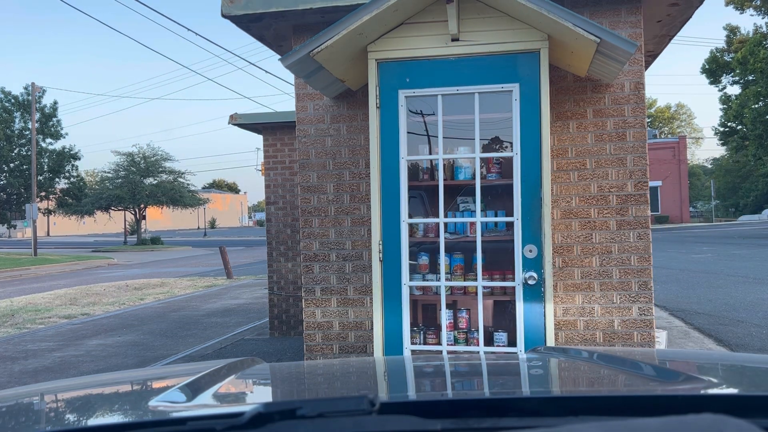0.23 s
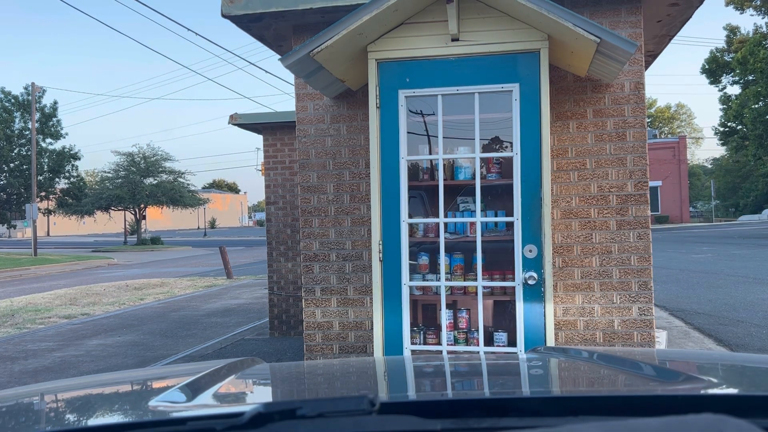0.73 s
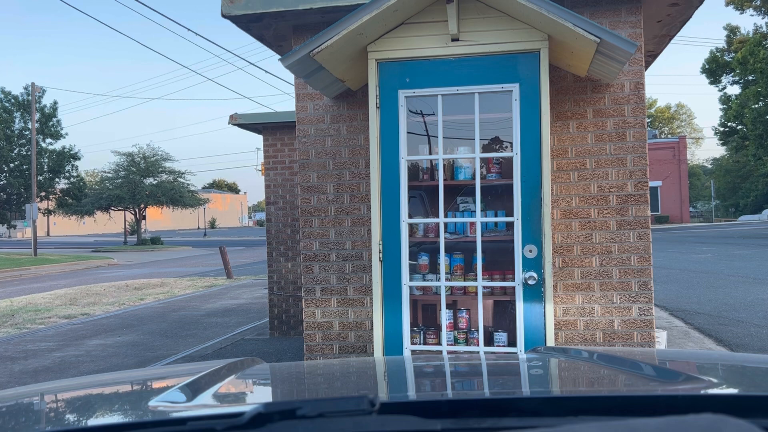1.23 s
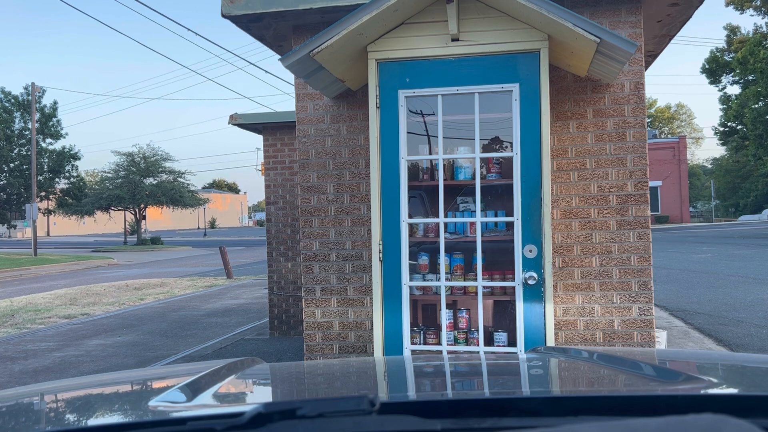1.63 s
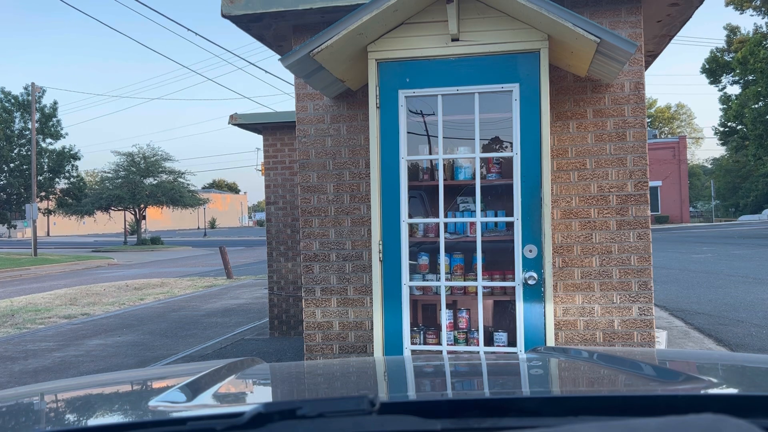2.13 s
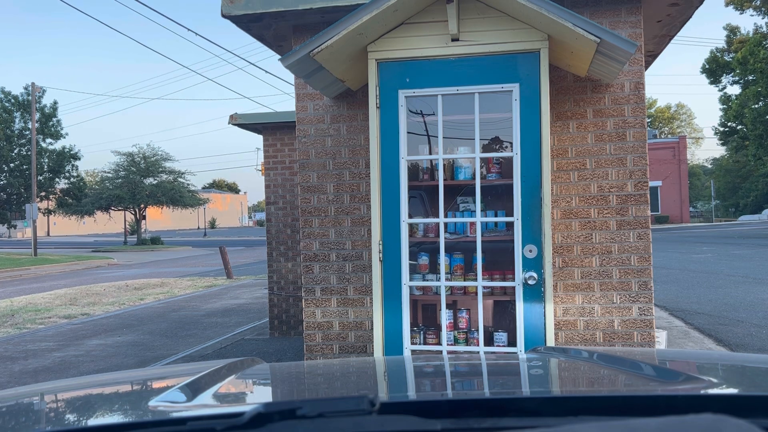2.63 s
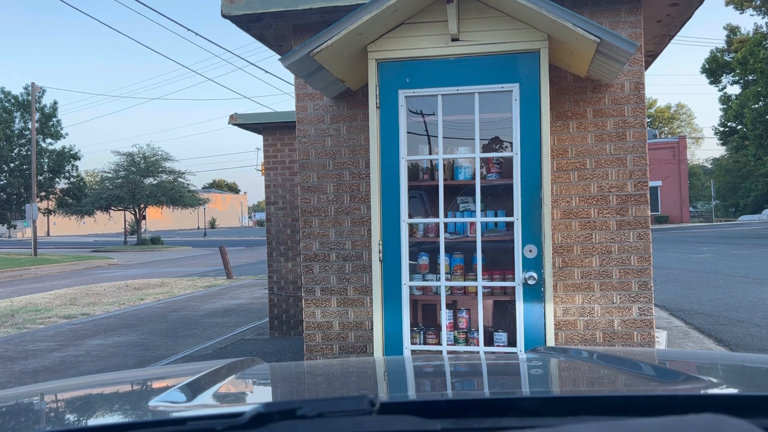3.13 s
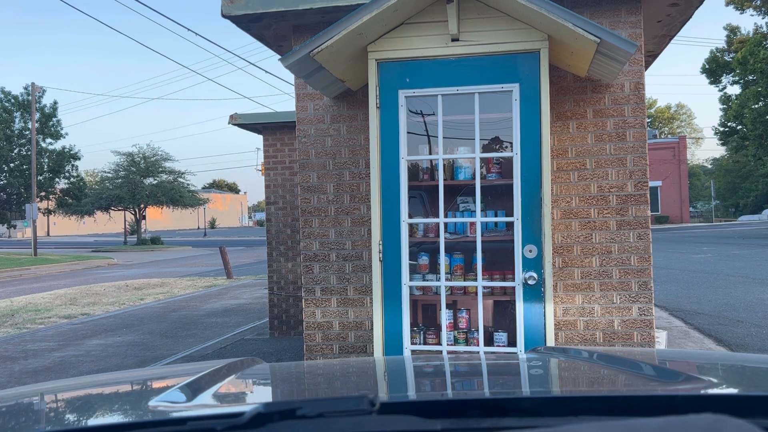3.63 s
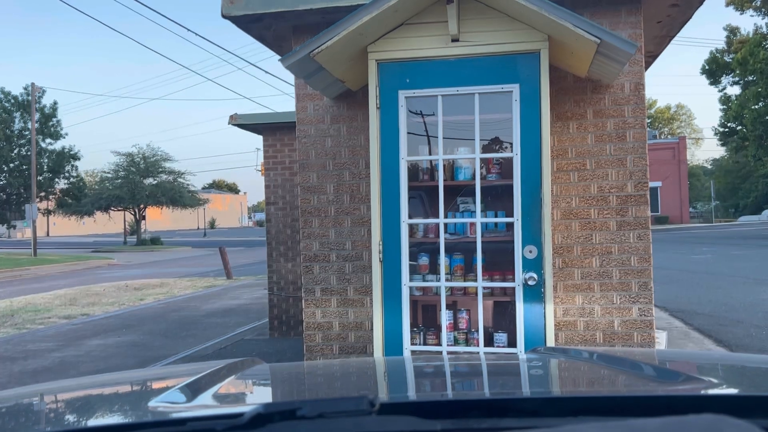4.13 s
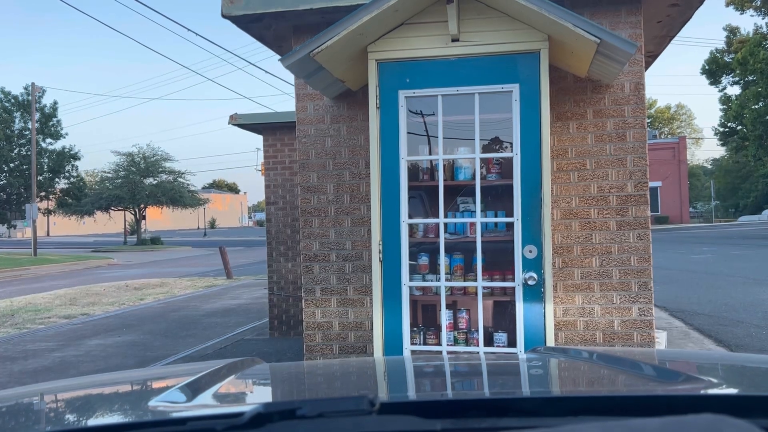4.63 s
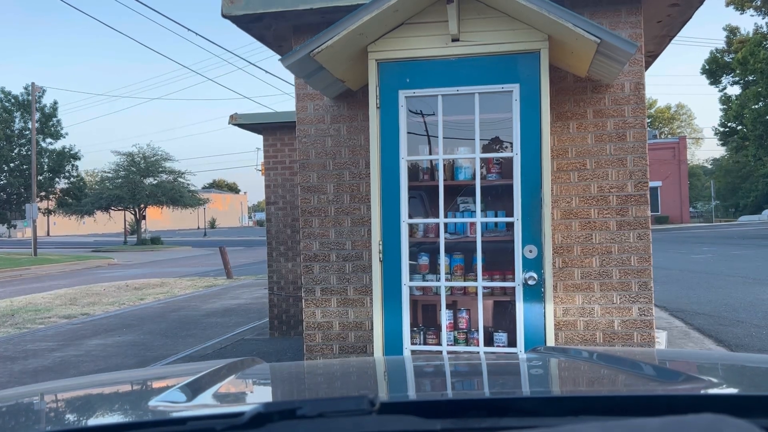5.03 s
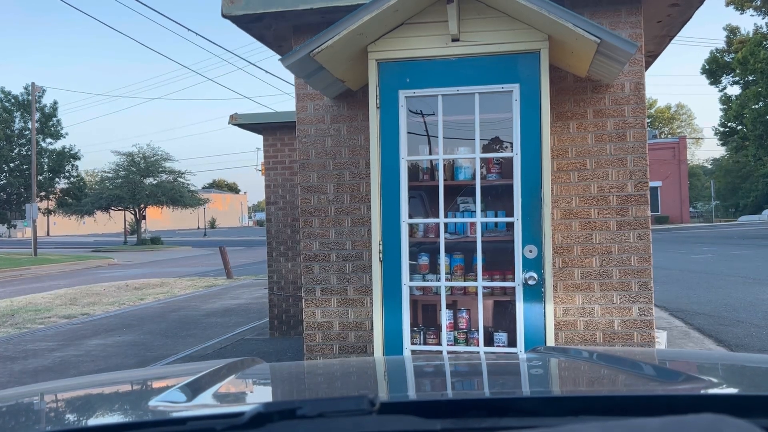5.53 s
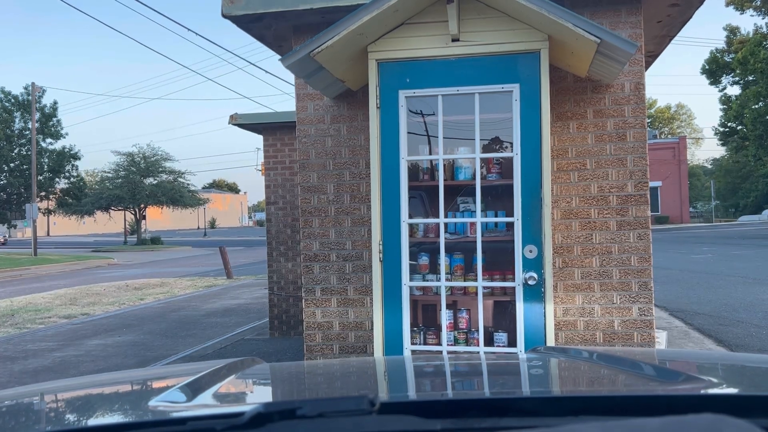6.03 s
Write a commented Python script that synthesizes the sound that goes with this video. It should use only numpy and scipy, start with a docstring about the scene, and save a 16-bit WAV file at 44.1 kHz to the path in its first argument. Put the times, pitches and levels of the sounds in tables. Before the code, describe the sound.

A close stereo microphone inside a small, padded car cabin picks up a steady bassy idle. Someone shifts on the seat, cloth scuffing and plastic ticking lightly, until a hard metallic latch clack. A couple of soft low bumps pass, then the door shuts heavily with a short rattle and sinking boom. Fabric swishes, ticks and dull knocks continue briefly, the last knock strong and low, then the engine idles on.

```python
"""Inside an idling car with one door open: clothes rustle on a seat, a latch clacks, the door is slammed.
Wavering low tones and coloured noise make the engine rumble; filtered hiss from outside drops at the slam.
Shaped noise and tiny random contacts make the cloth; decaying resonances make trim, latch and door.
The slam sets off sinking low tones and a dying chatter; more rustling and a few dull knocks follow."""
import sys
import numpy as np
from scipy import signal
from scipy.fft import rfft, irfft, next_fast_len
from scipy.io import wavfile
from scipy.ndimage import map_coordinates

SR = 44100
rng = np.random.default_rng(int(sys.argv[2]) if len(sys.argv) > 2 else 0)


def materialize(psi):
    """Save the field psi as 16-bit PCM at rate SR to the path in sys.argv[1].

    A 1-D psi becomes a single channel; in a 2-D psi each row is a channel.
    """
    bounded = np.clip(np.atleast_2d(psi).T, -1, 1)
    quanta = np.round(bounded * 32767).astype(np.int16)
    wavfile.write(sys.argv[1], SR, quanta)


N = 276948


def amp(db):
    """Decibels to gain."""
    return 10 ** (np.asarray(db) / 20)


def unit(x):
    """Scale to rms 1."""
    return x / np.sqrt(np.mean(x ** 2) + 1e-20)


def clock():
    """The time of every sample in seconds."""
    return np.arange(N) / SR


def along(points, hz):
    """Read a curve of (Hz, value) points on a log frequency axis."""
    point_hz, values = np.transpose(points)
    return np.interp(np.log(hz + 1), np.log(point_hz + 1), values)


def wobble(knots_per_s):
    """A smooth random curve through normally distributed knots."""
    return map_coordinates(rng.standard_normal(2048), [clock() * knots_per_s], mode="wrap")


def filtered(x, response):
    """Multiply the spectrum of x by a response given as a function of frequency."""
    n = x.shape[-1]
    padded = next_fast_len(n + 8192)
    return irfft(rfft(x, padded) * response(np.fft.rfftfreq(padded, 1 / SR)), padded)[..., :n]


def tilted(x, bright_db):
    """Brighten or dull a blow by about bright_db per octave, less so in the bass."""
    return filtered(x, lambda hz: amp(bright_db * np.log2((hz + 300) / 1600)))


def add(track, start_s, sound):
    """Mix a sound into the track, cut at the track's end."""
    part = track[..., round(start_s * SR):][..., :sound.shape[-1]]
    part += sound[..., :part.shape[-1]]


def swells(rows):
    """Sum of bell-shaped swells, one for each (center_s, level_db, length_s)."""
    t = clock()
    return sum(amp(db) * np.exp(-2 * ((t - s) / length) ** 2) for s, db, length in rows)


# left-right likeness: pitch_hz, correlation (1 = same, 0 = unrelated, -1 = opposite)
LIKENESS = [(60, 0.99), (130, 0.99), (290, 0.7), (640, -0.37), (1400, -0.067), (2400, 0.76), (4400, -0.16),
            (7000, 0.54), (15000, -0.41)]


def port_phase(hz):
    """Phase of a tone at left and right: the less alike the two sides, the further apart."""
    skew = np.arccos(np.clip(along(LIKENESS, hz), -1, 1)) / 2
    return np.array([-skew, skew])


def spread(pair):
    """Blend two unrelated signals into a cabin sound field: alike in the bass, less so higher up."""
    def mid_side(hz):
        turn = port_phase(hz)[1]
        return np.array([np.cos(turn), np.sin(turn)])
    mid, side = filtered(pair, mid_side)
    return np.array([mid + side, mid - side])


# standing waves of the cabin: pitch_hz, width_hz, gain_db
STANDING_WAVES = [(258, 31.6, -7.5), (559, 15.3, 9), (880, 50, 5), (1720, 57, -12), (1766, 89, 5.5)]


def hollow(hz):
    """Standing waves between glass and dashboard lift some bands and cut others."""
    return amp(sum(db / (1 + (2 * (hz - centre) / width) ** 2) for centre, width, db in STANDING_WAVES))


def rush(spectrum):
    """Stereo noise of rms 1 with the given colour, heard through the cabin."""
    noise = rng.standard_normal((2, N))
    return unit(spread(filtered(noise, lambda hz: amp(along(spectrum, hz)) * hollow(hz))))


def grains(per_s, spectrum):
    """Stereo stream of tiny random contacts with the given colour, heard through the cabin."""
    taps = (rng.random((2, N)) < per_s / SR) * rng.uniform(-0.89, 1, (2, N))
    return spread(filtered(taps, lambda hz: amp(along(spectrum, hz)) * hollow(hz)))


# decay of the cabin echo: pitch_hz, t60_s
ECHO_DECAY = [(150, 0.47), (1000, 0.14), (4000, 0.15), (12000, 0.0078)]


def in_cabin(x, wet_db):
    """Add the short, dense echo of glass and trim by convolving with decaying noise."""
    hz, t, bands = signal.stft(rng.standard_normal((2, SR // 3)), SR, nperseg=256)
    fade = amp(-60 * t / along(ECHO_DECAY, hz)[:, None])
    tail = spread(signal.istft(bands * fade, SR, nperseg=256)[1])
    echo = signal.fftconvolve(x, tail / np.linalg.norm(tail[0]), axes=1)[:, :N]
    return x + amp(wet_db) * echo


def strike(modes, crack_db, crack_t60, crack_hz, detune, rise=0.00074):
    """One stereo blow of peak 1: decaying modes and a short crack that dulls above crack_hz."""
    t = np.arange(SR // 3) / SR
    hz, db, t60 = np.transpose(modes)[:, :, None]
    # each contact point rings a little differently
    hz = hz * np.exp(detune * rng.standard_normal(hz.shape))
    mode_db = db + rng.standard_normal(hz.shape)
    sign = (-1) ** np.arange(len(hz))[:, None]
    size = sign * amp(mode_db - 60 * t / t60)
    ring = np.sum(size * np.sin(2 * np.pi * hz * t + port_phase(hz)), axis=1)
    noise = rng.standard_normal((2, len(t)))
    crack = unit(filtered(noise, lambda f: 1 / np.hypot(1, f / crack_hz)))
    blow = (ring + crack * amp(crack_db - 60 * t / crack_t60)) * (1 - np.exp(-t / rise))
    return blow / np.abs(blow).max()


BASS_SKEW = 0.15  # radians by which low thuds lag at left and lead at right


def soft_contacts(rows):
    """A cushioned contact swells and dies around its centre, on one damped resonance."""
    track, t = np.zeros((2, N)), np.arange(-SR // 8, SR // 8) / SR
    for center_s, db, hz, length_s in rows:
        tone = np.sin(2 * np.pi * hz * t + [[-BASS_SKEW], [BASS_SKEW]])
        add(track, center_s + t[0], amp(db) * np.exp(-(t / length_s) ** 2) * tone)
    return track


def shut():
    """How far the door has sealed: 0 while open, 1 once shut."""
    return np.interp(clock(), [3.95, 4.05], [0, 1])


FIRING_HZ = 32.4  # mean rate; it wavers slightly
# engine hum: multiple of the firing rate, open_db, shut_db (mean levels)
FIRING_ORDERS = [(1, -40, -39), (1.5, -36.5, -39.5), (2, -41.5, -47), (3, -45, -50), (4, -52, -55)]
# fan and belt-driven parts: pitch_hz, open_db, shut_db (mean levels)
FAN_AND_BELTS = [(39.1, -48.5, -46), (44.3, -42.5, -37), (79.4, -52, -47)]
# colour of the body noise before its low cut: pitch_hz, relative db per Hz
BODY_NOISE = [(15, -66), (27, -6), (53, 4.5), (72, -7.5), (128, -17), (200, -18), (245, -21), (310, -24),
              (450, -31.5), (560, -35.5), (900, -37.5), (1800, -47.5), (2700, -71.5), (4000, -73),
              (5700, -54), (8500, -70), (15000, -71)]


def engine():
    """Firing orders beat against fan and belts; shutting the door retunes the cabin, shifting levels."""
    turns = FIRING_HZ * np.cumsum(1 + 0.004 * wobble(3)) / SR
    tones = [(k * FIRING_HZ, k * turns, *levels) for k, *levels in FIRING_ORDERS]
    tones += [(hz, hz * (clock() + 0.00013 * wobble(3.7)), *levels) for hz, *levels in FAN_AND_BELTS]
    hum, sealed = 0, shut()
    for hz, cycles, open_db, shut_db in tones:
        level = amp(open_db + (shut_db - open_db) * sealed + wobble(2.75))
        hum = hum + np.sqrt(2) * level * np.sin(2 * np.pi * cycles + port_phase(hz)[:, None])
    body = filtered(rush(BODY_NOISE), lambda hz: 1 / np.hypot(1, (95 / (hz + 1)) ** 2))
    # the body noise swells with each firing
    throb = 1 + 0.25 * np.cos(2 * np.pi * turns)
    return hum + amp(-25.0 - 0.8 * sealed) * body * throb


# colour of the outside hiss: pitch_hz, relative db per Hz
OUTSIDE_HISS = [(120, -11.5), (280, -2.5), (450, -13.5), (560, -6), (720, -14), (920, -9.5), (1900, -18),
                (2750, -22.5), (3800, -17), (5800, -15), (8000, -36.5), (15000, -142.5)]
# sideways lean of the hiss: pitch_hz, lean_db (raises left and lowers right)
LEFT_LEAN = [(480, .5), (950, -1), (3800, 1.4)]


def outside():
    """Hiss from the street and engine bay, leaning left in the treble, weaker once the door seals."""
    hiss = filtered(rush(OUTSIDE_HISS), lambda hz: amp(along(LEFT_LEAN, hz) * [[1], [-1]]))
    return amp(-45 - 5.3 * shut()) * hiss


RELEASE_S = 0.069  # time constant of the cloth settling after each shift
# shifts of weight on the seat: full_s (fully moving), level_db, attack_s, hold_s
WEIGHT_SHIFTS = [(0.257, -47.5, 0.1, 0.019), (0.545, -41.5, 0.017, 0.012), (0.736, -44, 0.052, 0.0059),
                 (1.029, -40.5, 0.047, 0.055), (1.499, -42.5, 0.058, 0.029), (1.926, -38, 0.14, 0.087),
                 (2.38, -31.5, 0.047, 0.01), (3.483, -45, 0.27, 0.4), (3.784, -40.5, 0.027, 0.075),
                 (3.907, -36, 0.035, 0.068), (4.172, -30, 0.0015, 0.11), (4.352, -35.5, 0.019, 0.19),
                 (4.61, -36.5, 0.018, 0.11)]


def shifting():
    """Strength of the rubbing: each shift of weight builds up, holds and dies away."""
    t, power = clock(), 0
    for full_s, db, attack_s, hold_s in WEIGHT_SHIFTS:
        rise = np.exp(-(np.minimum(t - full_s, 0) / attack_s) ** 2)
        fall = np.exp(-np.maximum(t - full_s - hold_s, 0) / RELEASE_S)
        power = power + (amp(db) * rise * fall) ** 2
    return np.sqrt(power)


# colour of light rubbing: pitch_hz, relative db per Hz
LIGHT_RUB = [(150, 19.5), (400, 4), (900, 1), (1700, -6), (2800, -7), (4500, -6), (7500, -12.5),
             (15000, -16)]


def rubbing():
    """Light rubbing is flickering noise that follows each shift of weight."""
    return shifting() * unit(rush(LIGHT_RUB) * amp(0.82 * wobble(150)))


SNAG_DB, SNAG_PER_S = 3, 70  # a slide sticks and lets go: depth and rate
# colour of firm rubbing: pitch_hz, relative db per Hz
FIRM_RUB = [(150, -3), (700, 1), (1700, 0), (2700, -6), (4000, -5), (7000, -14), (15000, -21)]
# firm slides across the upholstery: center_s, level_db, length_s
FIRM_SLIDES = [(.75, -42.5, 0.034), (1.04, -34, 0.025), (1.36, -41.5, 0.046), (1.97, -48, 0.15),
               (2.39, -27, 0.03), (4.182, -32, 0.0068), (4.631, -32.5, 0.026)]


def sliding():
    """In a firm slide the cloth catches and slips in tiny grains, unevenly loud."""
    scrape = grains(1200, FIRM_RUB) * amp(SNAG_DB * wobble(SNAG_PER_S))
    return swells(FIRM_SLIDES) * unit(in_cabin(scrape, wet_db=-2.5))


SWISH_HZ, SWISH_OCTAVES = 12500, 6.9  # centre and width of the hiss
# brief swishes of smooth fabric: center_s, level_db, length_s
FABRIC_SWISHES = [(3.5, -51, 0.19), (4.26, -41.5, 0.06), (4.38, -42, 0.012), (4.543, -36, 0.009),
                  (4.69, -39.5, 0.031)]


def swishing():
    """Smooth fabric gives brief swells of broad, bright hiss."""
    def colour(hz):
        return np.exp(-(np.log2((hz + 1) / SWISH_HZ) / SWISH_OCTAVES) ** 2)
    hiss = spread(filtered(rng.standard_normal((2, N)), colour))
    return swells(FABRIC_SWISHES) * unit(hiss)


FUMBLE_PER_S, FUMBLE_DB = 23, -10.5  # mean contacts at each place, and their level against the cloth
# trim ring: pitch_hz, relative level_db, t60_s
TRIM_RING = [(407, -11.5, 0.032), (700, -16, 0.015), (860, -18, 0.028), (1072, 1.5, 0.05), (1400, 8, 0.037),
             (1438, 4, 0.033), (1818, 5, 0.054), (2220, -11, 0.021), (2802, 1, 0.038)]


def fumbling():
    """Seams and buttons scuff the trim at many random places, as hard as the body is moving."""
    rattle = 0
    for place in range(12):
        taps = (rng.random(N) < FUMBLE_PER_S / SR) * rng.standard_normal(N)
        blow = strike(TRIM_RING, crack_db=11, crack_t60=0.02, crack_hz=1700, detune=0.15)
        rattle = rattle + signal.oaconvolve(taps[None], blow, axes=1)[:, :N]
    return amp(FUMBLE_DB) * shifting() * unit(rattle)


CLICK_RISE_S = 0.0012  # padded contacts build up gently
# ticks of loose trim: start_s, peak_db (before tilt, echo and pan), brightness in db per octave
TRIM_TICKS = [(0.253, -30, -5), (0.43, -30.5, -9), (0.465, -25, -5.5), (0.548, -29, -4),
              (0.621, -30.5, -7.5), (0.99, -29.5, -1.5), (1.024, -29, -1), (1.051, -27, -1),
              (1.104, -24, -6.5), (1.137, -30.5, -6), (1.198, -30.5, -4), (1.353, -27, -2.5),
              (1.406, -29.5, -4.5), (1.8116, -28.5, 0.5), (2.298, -29, -11), (2.323, -31, -2.5),
              (2.46, -30, -3), (3.866, -25.5, -7), (4.1757, -19, -1), (4.214, -26, -2), (4.264, -25.5, 3),
              (4.32, -26.5, -0.5), (4.331, -25.5, -9.5), (4.515, -22, -13), (4.54, -26.5, -6.5),
              (4.614, -29, 0)]


def clicks():
    """Loose trim ticks and scuffs, leaning right, each contact with its own brightness."""
    track = np.zeros((2, N))
    for start_s, db, bright_db in TRIM_TICKS:
        blow = strike(TRIM_RING, crack_db=5, crack_t60=0.05, crack_hz=2600, detune=0.07, rise=CLICK_RISE_S)
        add(track, start_s, amp(db) * tilted(blow, bright_db))
    return in_cabin(track, wet_db=-8.5) * amp([[-1], [1]])


# brief pitched contacts of trim, short squeaks and one dull click at 4.493 s:
# center_s, peak_db (before echo and pan), pitch_hz, length_s
PITCHED_CONTACTS = [(1.95, -43, 3030, 0.0055), (4.29, -37, 3780, 0.0058), (4.493, -21, 1100, 0.0016)]


def pitched_contacts():
    """Trim gives short squeaks and one dull click, each a brief swell of one pitch, leaning right."""
    return in_cabin(soft_contacts(PITCHED_CONTACTS) * amp([[-2], [2]]), wet_db=-11.0)


KNOCK_CYCLES = 1.15  # half-length of a knock, in cycles of its resonance
PUFF_DB, PUFF_HZ = -20.5, 340  # puff level against its knock; dull above this pitch
PUFF_LEAD_S, PUFF_S = 0.0083, 0.024  # the puff comes as the padding first gives way, and is brief
# dull knocks on door seal, seat and floor: center_s, peak_db, pitch_hz
DULL_KNOCKS = [(2.39, -17, 147), (2.401, -15, 68.5), (2.677, -18.5, 55), (2.807, -24.5, 335),
               (3.021, -29.5, 360), (3.969, -15.5, 297), (4.444, -17.5, 106), (4.486, -19, 183),
               (4.514, -15, 131), (4.536, -12, 102), (4.646, -1.5, 120)]


def knocks():
    """Lower knocks last longer; each squeezes a dull puff of noise out of the padding."""
    thuds = soft_contacts([(s, db, hz, KNOCK_CYCLES / hz) for s, db, hz in DULL_KNOCKS])
    noise = rng.standard_normal((2, N))
    air = unit(spread(filtered(noise, lambda hz: 1 / (1 + (hz / PUFF_HZ) ** 4))))
    puffs = swells([(s - PUFF_LEAD_S, db + PUFF_DB, PUFF_S) for s, db, hz in DULL_KNOCKS]) * air
    return thuds + in_cabin(puffs, wet_db=-13.5)


# latch ring: pitch_hz, relative level_db, t60_s
LATCH_RING = [(704, 3.5, 0.026), (980, 11.5, 0.018), (1136, 1, 0.074), (1300, 8, 0.049), (1474, 9, 0.037),
              (1710, 11, 0.021), (2183, 0, 0.036)]
# the latch takes up its play, snaps and rebounds:
# start_s, peak_db (before tilt, echo and pan), brightness in db per octave
LATCH_CONTACTS = [(2.357, -22, 1), (2.378, -18, 1.5), (2.3886, -5.5, -1), (2.3965, -17, -2)]


def latch():
    """The latch gives a quick cluster of sharp metal contacts, the snap by far the hardest."""
    track = np.zeros((2, N))
    for start_s, db, bright_db in LATCH_CONTACTS:
        blow = strike(LATCH_RING, crack_db=2, crack_t60=0.03, crack_hz=1800, detune=0.015)
        add(track, start_s, amp(db) * tilted(blow, bright_db))
    return in_cabin(track, wet_db=-16.0) * amp([[-1], [1]])


# bursts of air at the seal: center_s, level_db (before pan), length_s
SEAL_BURSTS = [(3.9655, -23, 0.0035), (3.9755, -15.5, 0.0032), (4.031, -21, 0.0041)]
# colour of the bursts: pitch_hz, relative db per Hz
SEAL_COLOUR = [(100, -9), (230, -9), (350, -8), (450, -21), (620, 3), (720, 1), (950, -21), (8000, -62)]


def seal():
    """Air bursts past the rubber seal as the door squeezes it."""
    return swells(SEAL_BURSTS) * rush(SEAL_COLOUR) * amp([[-1.5], [1.5]])


# low swings of the cabin air and body:
# start_s, level_db (before rise and decay), settled_hz, extra_hz at the start, rise_s, t60_s
LOW_SWINGS = [(3.979, -5, 46.4, 82, 0.0078, 0.64), (3.979, -3.5, 158.4, 19, 0.00079, 0.088),
              (3.991, -14, 93.7, 1, .006, 0.58), (4.034, -9, 62.5, 5, 0.014, .6),
              (4.172, -8.5, 51.7, 3, 0.0091, 0.38)]
SAG_S = 0.017  # time constant of the sink to settled pitch


def booms():
    """The trapped air and the body swing on after the slam, sinking in pitch as the door settles."""
    track, t = np.zeros((2, N)), np.arange(SR) / SR
    for start_s, db, hz, extra_hz, rise_s, t60 in LOW_SWINGS:
        cycles = hz * t + extra_hz * SAG_S * (1 - np.exp(-t / SAG_S))
        envelope = amp(db - 60 * t / t60) * (1 - np.exp(-(t / rise_s) ** 2))
        add(track, start_s, envelope * np.sin(2 * np.pi * cycles + [[-BASS_SKEW], [BASS_SKEW]]))
    return track


JUDDER_DB, JUDDER_T60, JUDDER_PER_S = -18.5, 0.35, 900  # starting level, decay in s, mean contacts per s
# colour of juddering glass, linkage and trim: pitch_hz, relative db per Hz
JUDDER_COLOUR = [(60, -8), (115, 2), (200, -12), (330, -12), (450, -23), (650, -18), (1000, -32),
                 (1700, -29), (9000, -66)]


def judder():
    """Once the door is caught, its loose parts chatter irregularly and die away."""
    t = clock() - LOW_SWINGS[0][0]  # starts with the first boom
    decay = (t > 0) * amp(JUDDER_DB - 60 * np.abs(t) / JUDDER_T60)
    return decay * unit(grains(JUDDER_PER_S, JUDDER_COLOUR))


# door panel ring: pitch_hz, relative level_db, t60_s
PANEL_RING = [(116, 0, 0.4), (169.6, -2, 0.14), (275, -3, 0.085), (340, -9, 0.085)]
# door catch ring: pitch_hz, relative level_db, t60_s
CATCH_RING = [(535, 0, .04), (636, 5, .035), (735, -5, .03), (1452, -3, .026), (1761, -1, .026),
              (2081, -5, .022), (4684, -16, .025)]
# the slam, seal then catch then rebound: start_s, panel_db, catch_db (peaks before echo and pan)
SLAM_CONTACTS = [(3.962, -17, -23.5), (3.9738, -29, -5), (3.9762, -13, -15.5), (4.011, -16, -46),
                 (4.0271, -9.5, -21.5)]


def door():
    """The door meets its seal, snaps into the catch and rebounds; each contact shakes the panel."""
    panel, catch = np.zeros((2, N)), np.zeros((2, N))
    for start_s, panel_db, catch_db in SLAM_CONTACTS:
        thump = strike(PANEL_RING, crack_db=-43, crack_t60=0.087, crack_hz=200, detune=0.023)
        add(panel, start_s, amp(panel_db) * thump)
        clack = strike(CATCH_RING, crack_db=-5, crack_t60=0.046, crack_hz=1700, detune=0.0031)
        add(catch, start_s, amp(catch_db) * clack)
    return in_cabin(panel + catch * amp([[-1.2], [1.2]]), wet_db=-10.0)


def scene():
    """Everything as heard from the front seat."""
    background = engine() + outside()
    clothes = rubbing() + sliding() + swishing() + fumbling()
    contacts = clicks() + pitched_contacts() + knocks() + latch()
    slam = seal() + booms() + judder() + door()
    return background + clothes + contacts + slam


LOW_HZ, TOP_HZ = 21, 15200  # bass corner and upper band limit
NOTCH_HZ, NOTCH_WIDTH_HZ, NOTCH_DB = 10000, 850, -20


def record(dry):
    """Roll off the deepest bass and limit the band."""
    def response(hz):
        notch = amp(NOTCH_DB * np.exp(-((hz - NOTCH_HZ) / NOTCH_WIDTH_HZ) ** 2))
        bass = 1 / np.hypot(1, (LOW_HZ / (hz + 1)) ** 6)
        return notch * bass * (hz < TOP_HZ)
    return filtered(dry, response)


dry = scene()
out = record(dry)
materialize(out)
```